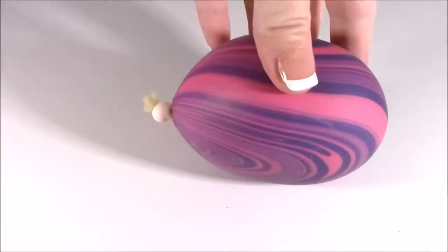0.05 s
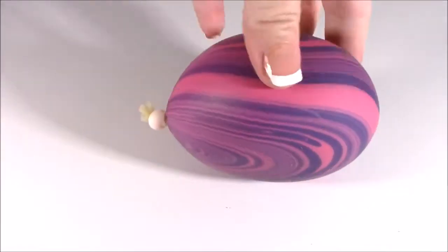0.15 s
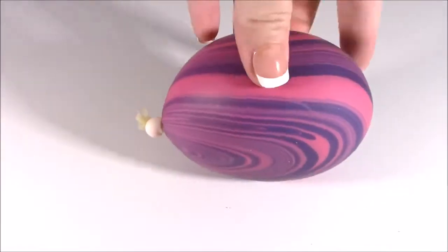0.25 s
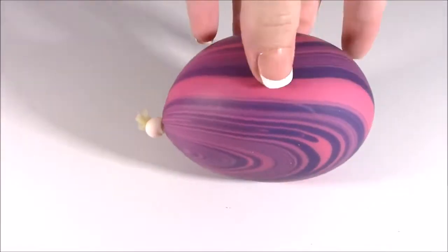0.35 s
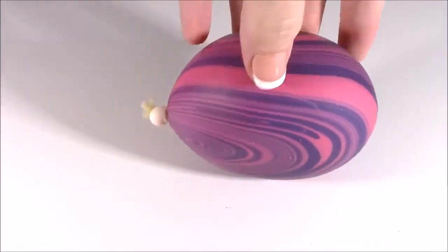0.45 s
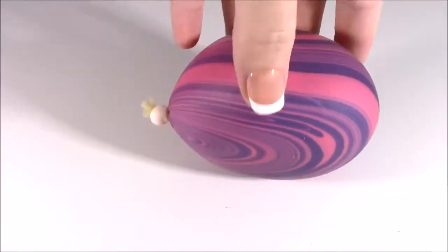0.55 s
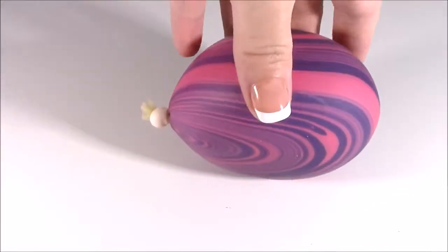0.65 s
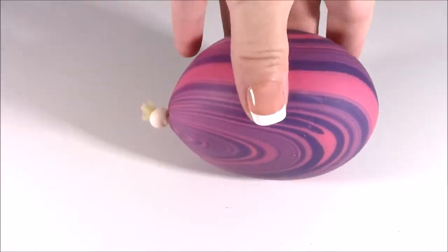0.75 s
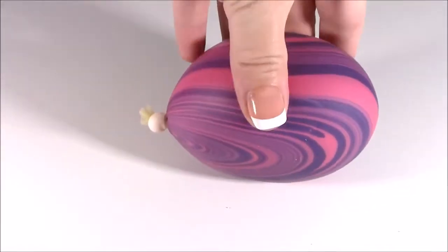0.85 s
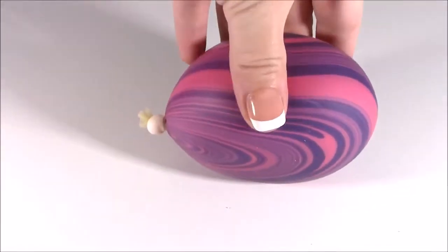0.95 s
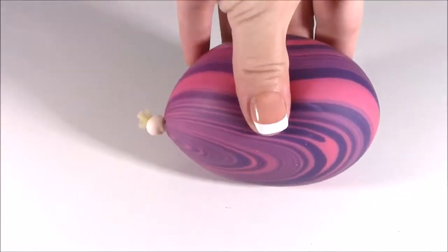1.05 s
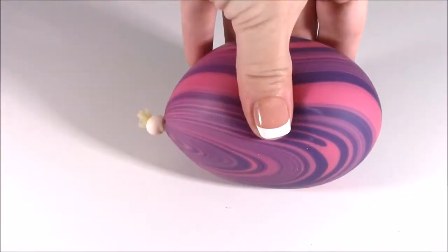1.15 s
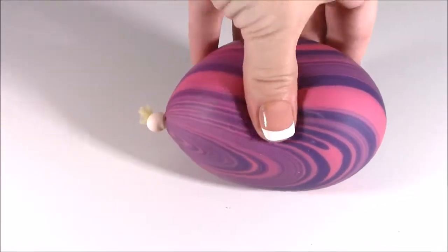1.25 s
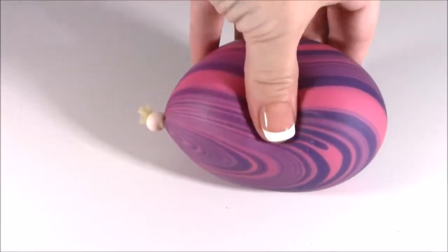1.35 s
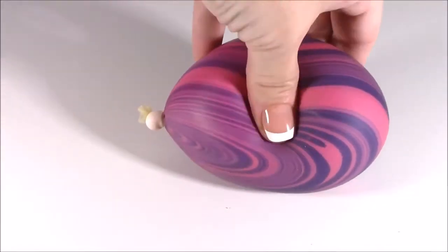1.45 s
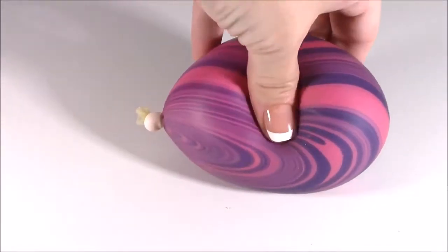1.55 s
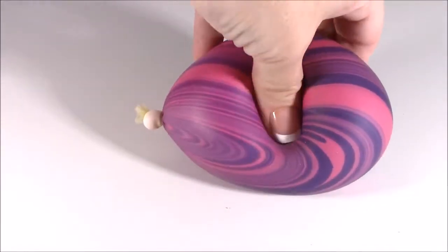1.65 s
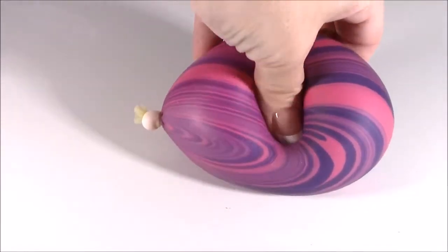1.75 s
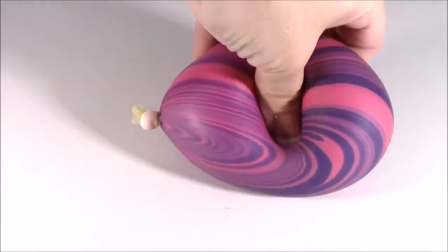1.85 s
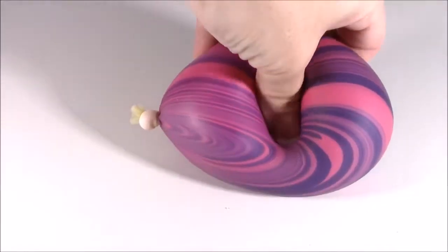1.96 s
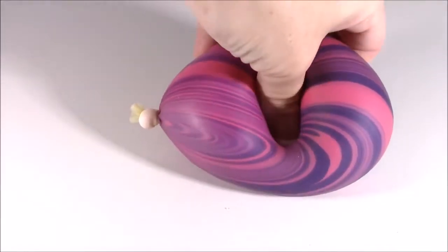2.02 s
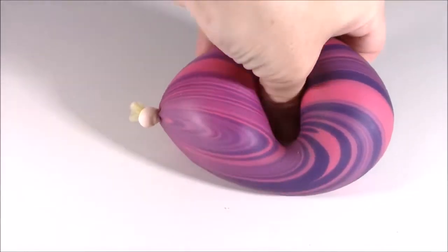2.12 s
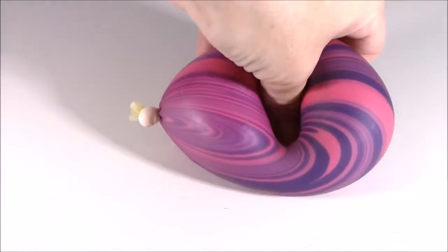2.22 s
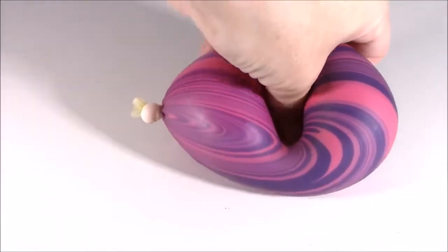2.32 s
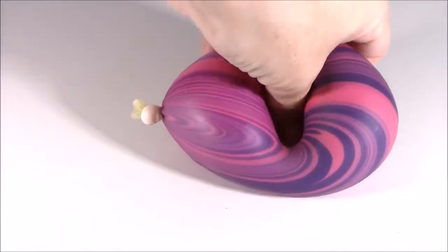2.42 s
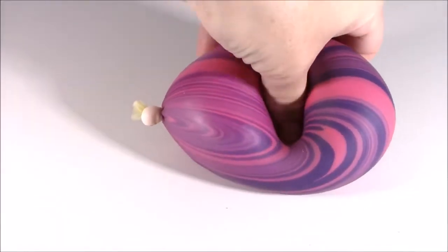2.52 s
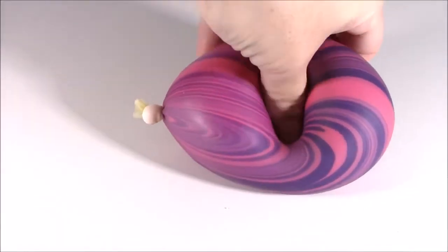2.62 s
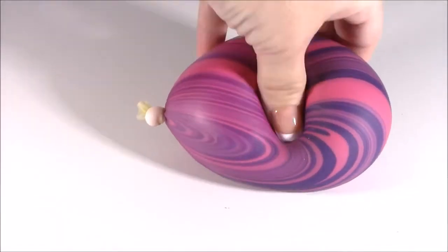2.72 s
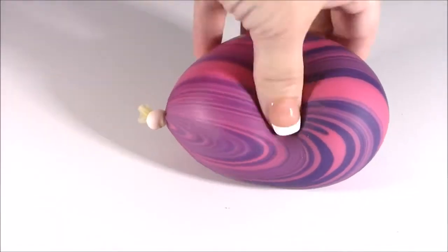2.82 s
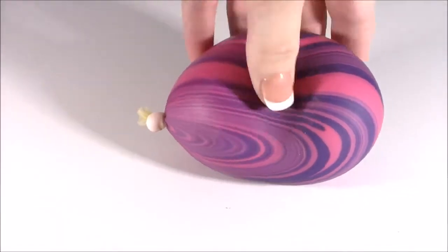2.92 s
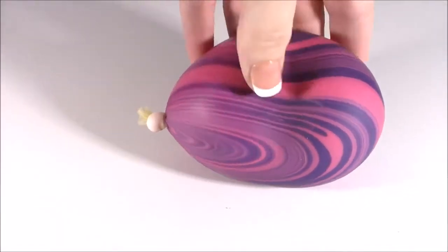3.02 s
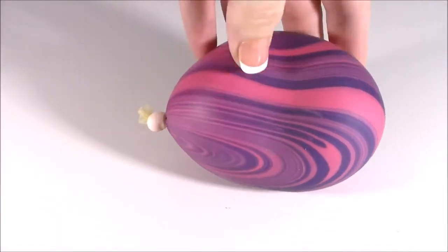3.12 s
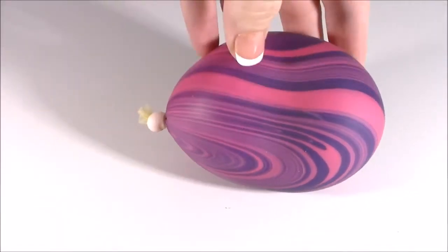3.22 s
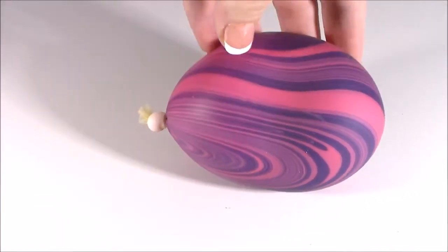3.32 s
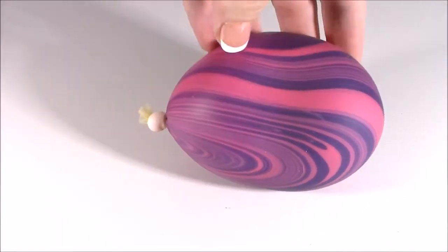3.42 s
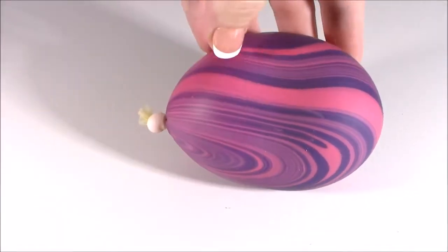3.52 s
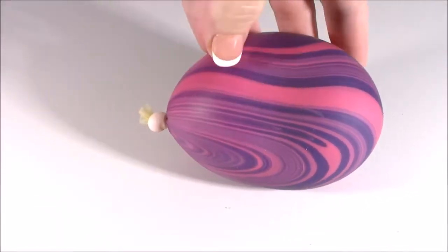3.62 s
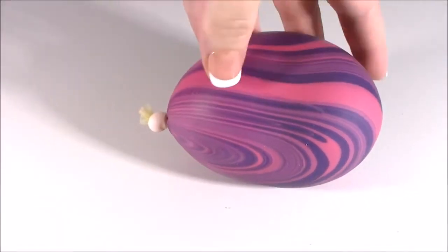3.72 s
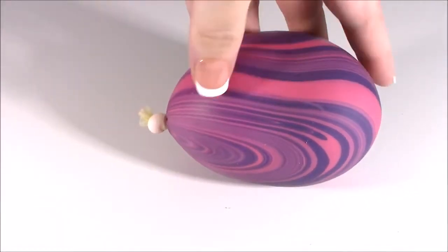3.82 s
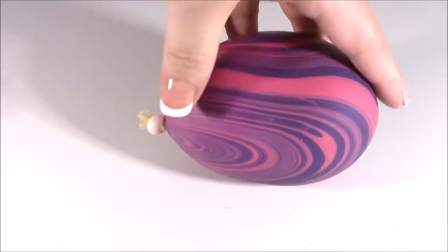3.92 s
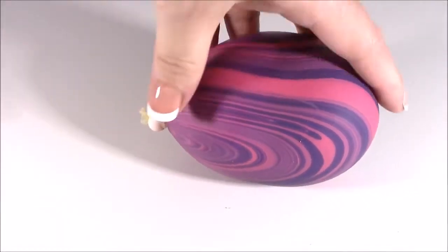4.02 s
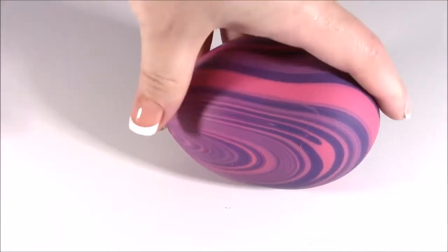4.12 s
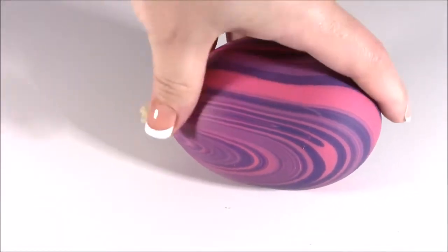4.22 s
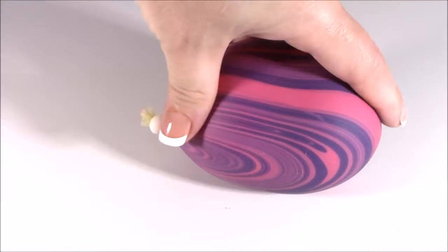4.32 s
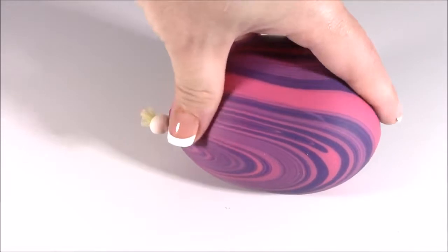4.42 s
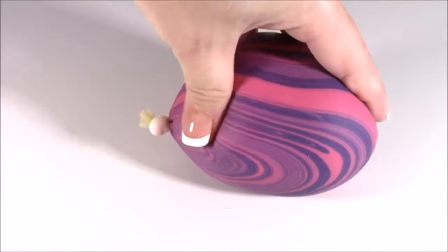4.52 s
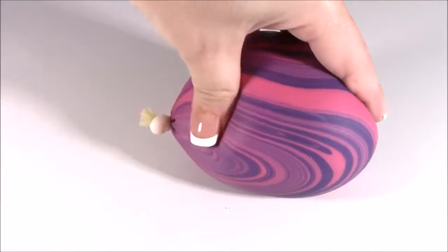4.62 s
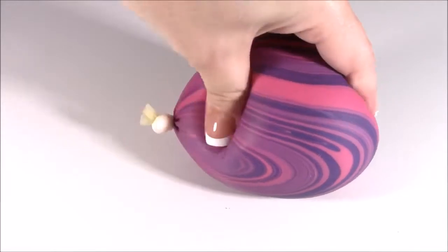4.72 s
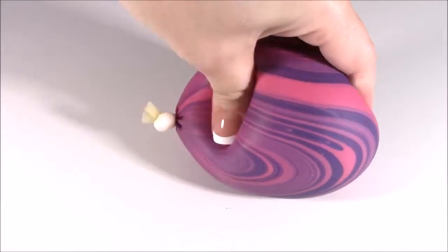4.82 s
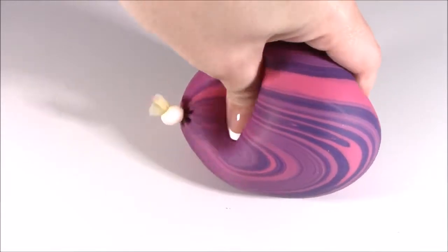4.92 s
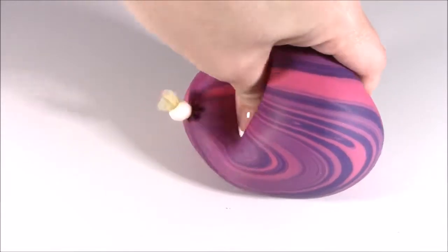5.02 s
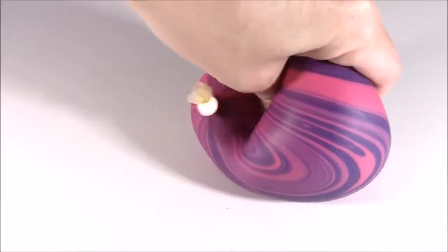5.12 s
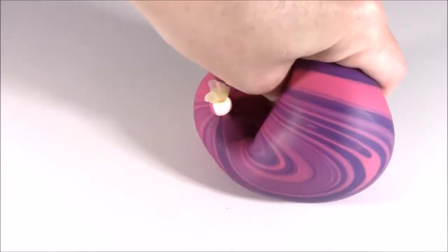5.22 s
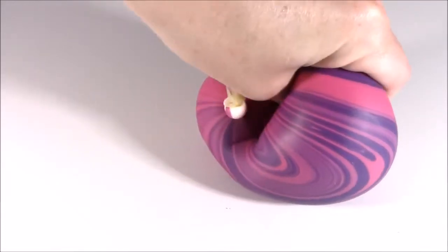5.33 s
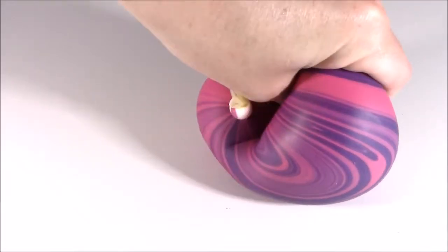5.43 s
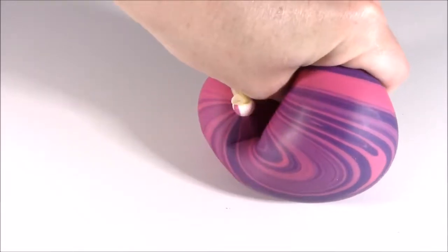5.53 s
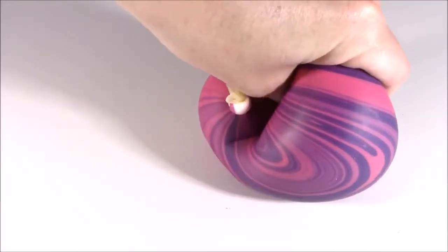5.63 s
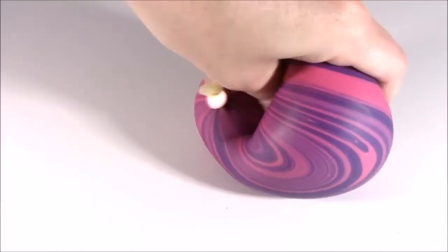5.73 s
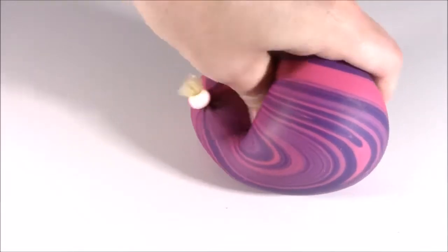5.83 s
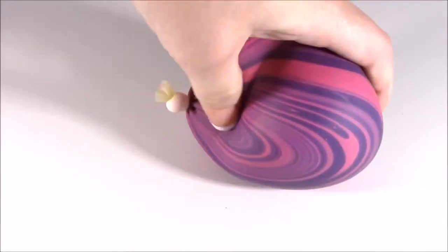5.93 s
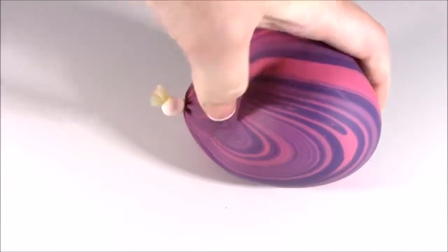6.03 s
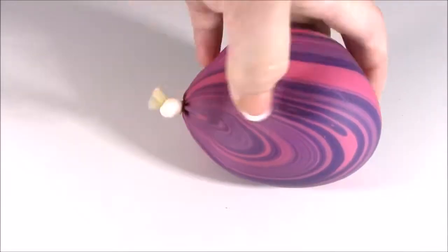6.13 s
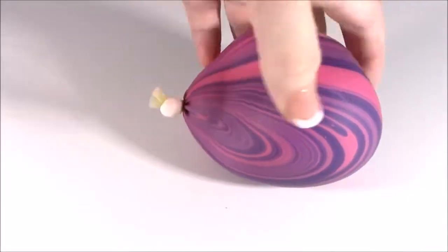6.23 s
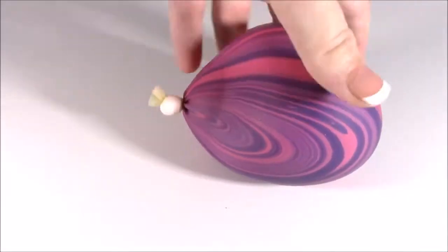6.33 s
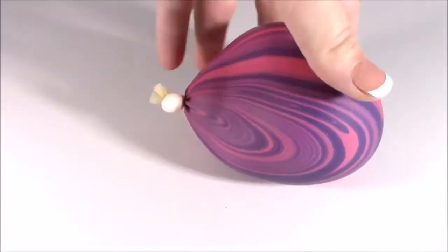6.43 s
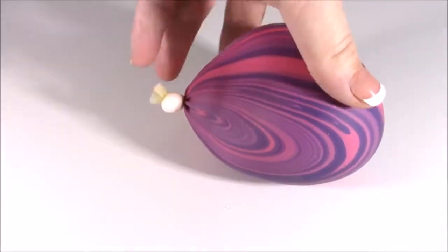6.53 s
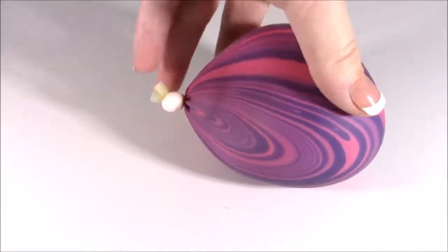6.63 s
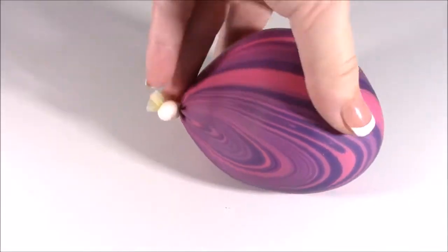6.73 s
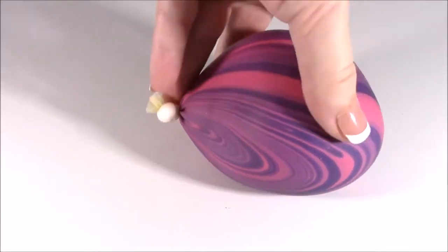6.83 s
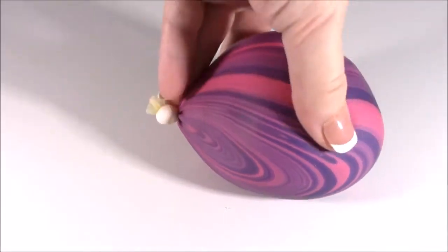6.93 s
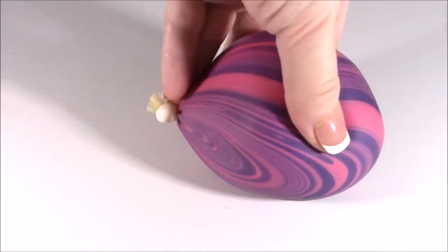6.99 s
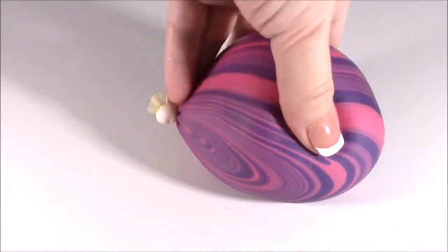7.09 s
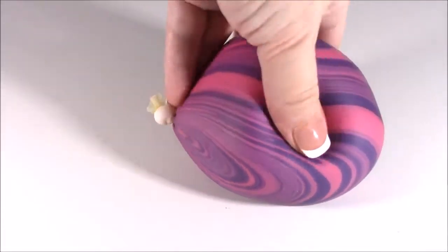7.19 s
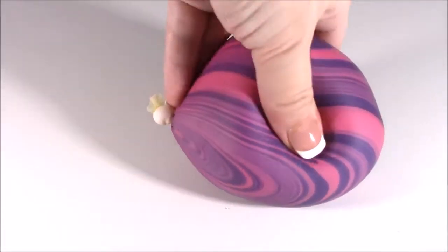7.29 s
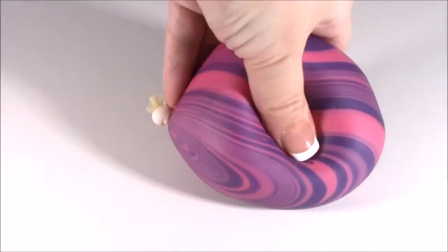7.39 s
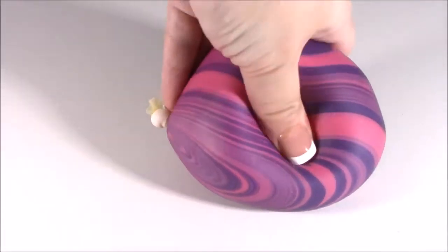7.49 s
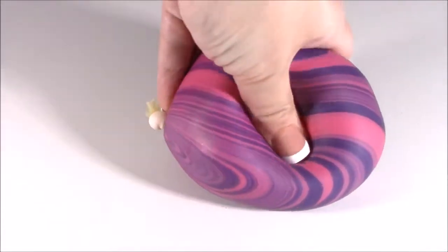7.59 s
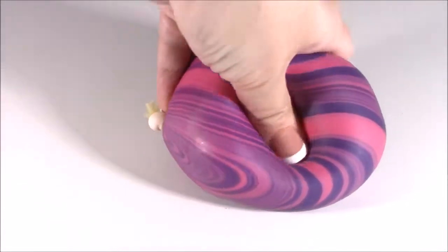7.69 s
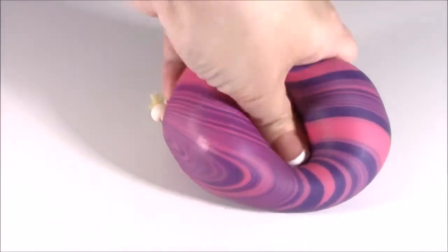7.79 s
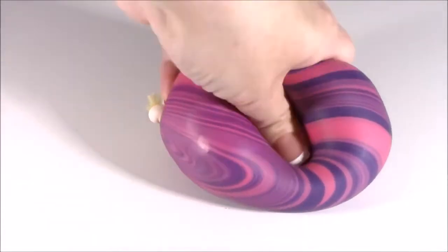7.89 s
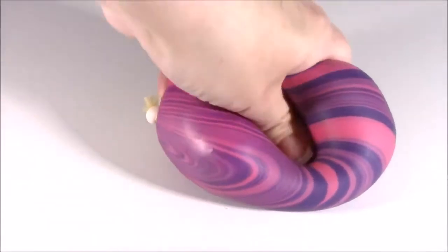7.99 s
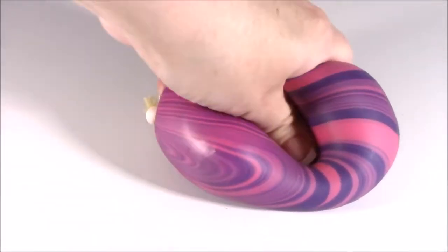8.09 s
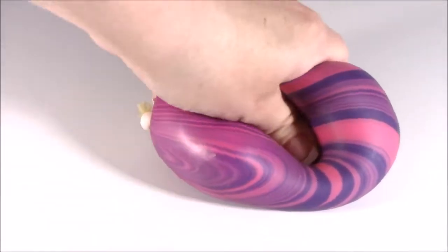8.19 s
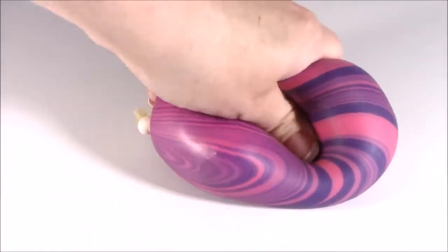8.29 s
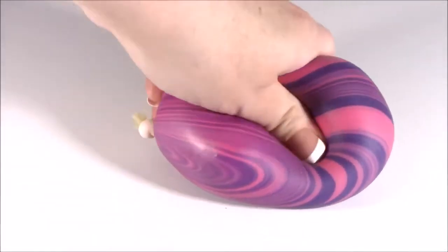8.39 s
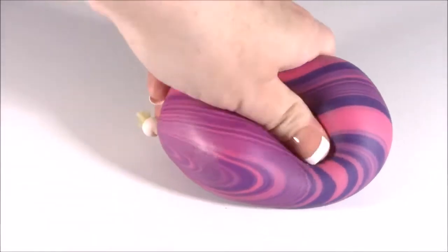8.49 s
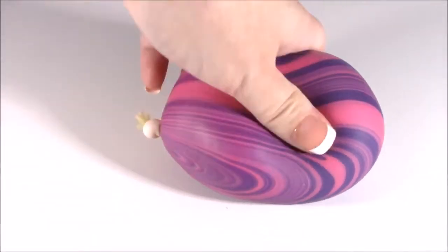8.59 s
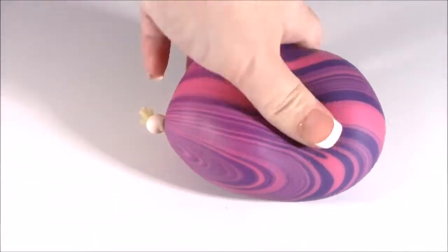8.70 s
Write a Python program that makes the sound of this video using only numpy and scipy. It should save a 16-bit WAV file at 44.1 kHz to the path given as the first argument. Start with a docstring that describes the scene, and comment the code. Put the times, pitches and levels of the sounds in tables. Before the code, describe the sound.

Close in a small quiet room, a thumb presses a soft-filled rubber balloon on a table. Sparse ticks lead into gritty, crunching squeaks as it sinks in; then the ball swells back with a louder burst of crackles, snaps and rubbery creaks. This happens three times, with quiet gaps of faint ticking between. Low room rumble sits underneath, the top treble is dull, and a short soft room tail surrounds it.

```python
"""In a small quiet room, on a table, a thumb kneads a balloon stuffed with soft filling: three slow squeezes.
Clumped ringing grains and low noise make the filling crunch, squeak and heave as each press sinks and lets go.
The rubber snaps (filtered kicks), brushes (swelling noise), creaks (trains of slips) and pops (gliding twangs).
Low decaying sines wobble the ball on the table; room modes, a diffuse tail and room tone surround it."""
import sys
import numpy as np
from scipy import signal
from scipy.fft import rfft, irfft
from scipy.io import wavfile

SR = 44100
rng = np.random.default_rng(int(sys.argv[2]) if len(sys.argv) > 2 else 0)


def inscribe(sig):
    """Save sig as 16-bit PCM at rate SR to the path in sys.argv[1].

    A 1-D sig is mono; a 2-D sig holds one channel per row.
    Samples are clipped to [-1, 1] before scaling.
    """
    pcm = np.round(np.clip(np.atleast_2d(sig).T, -1, 1) * 32767)
    wavfile.write(sys.argv[1], SR, pcm.astype(np.int16))


N = 385875

# colour of the room tone: f/Hz, relative level/dB
ROOM_TONE_COLOUR = [(15, -34.5), (27, -13), (45, -2.5), (174, -0.5), (212, -6.5), (246, -1.5), (315, -8),
                    (425, -5.5), (470, -10), (811, -10.5), (874, -13), (1550, -16.5), (3980, -23.5),
                    (6710, -28), (9500, -54), (12400, -99), (20900, -120)]
# left-right likeness of the room tone: f/Hz, likeness (1 = identical)
ROOM_TONE_LIKENESS = [(40, 0.96), (130, 0.72), (400, 0.59), (1500, 0.72), (8000, 0.97)]
ROOM_TONE_DB = -57.5   # level of what both sides share

# how hard the filling is worked while the thumb sinks in, one curve per squeeze: t/s, crunch drive level/dB
PRESS_CURVES = [
    [(.85, -67), (1.42, -54.5), (1.65, -57), (1.69, -44.5), (1.8, -51), (1.85, -48), (1.92, -55),
     (1.98, -57), (2.25, -45), (2.38, -60)],
    [(4.19, -69), (4.25, -59), (4.55, -52), (4.82, -52.5), (5.02, -45), (5.08, -37), (5.2, -45),
     (5.32, -48), (5.5, -61)],
    [(6.67, -60), (6.8, -59), (6.88, -50), (6.95, -55), (7.45, -53.5), (7.8, -50), (8.05, -47.5),
     (8.2, -58)],
]
# the same while the hand lets go and the ball swells back: t/s, crunch drive level/dB
RELEASE_CURVES = [
    [(2.38, -60), (2.51, -55), (2.57, -38), (2.67, -39), (2.7, -41), (2.745, -38.5), (2.765, -43),
     (2.81, -38), (2.87, -53), (2.95, -59), (3.2, -68)],
    [(5.5, -61), (5.64, -48), (5.72, -46), (5.76, -41), (5.84, -41), (5.89, -35.5), (5.93, -41.5),
     (5.985, -57), (6.3, -67)],
    [(8.2, -58), (8.29, -53), (8.33, -47), (8.39, -48), (8.49, -41), (8.54, -45), (8.61, -43.5),
     (8.75, -57.5)],
]
# how much the skin clings, one row per squeeze: crackle above crunch in the press, in the release: level/dB, level/dB
SKIN_CLING = [(-4, -14), (-5.5, -3.5), (-3, -1)]
REST_DB, FULL_DB = -71, -35   # crunch drive under a resting hand, and at full effort

# colour of the low heave: f/Hz, relative level/dB
HEAVE_COLOUR = [(35, -18.5), (60, -3), (120, 4.5), (190, 8), (280, 6.5), (450, -47)]
# colour of the crunching filling: f/Hz, relative level/dB
CRUNCH_COLOUR = [(250, 1), (450, -6), (800, 4.5), (1200, -7.5), (1800, -5), (2500, -19.5)]
# colour of the small squeaks: f/Hz, relative level/dB
SQUEAK_COLOUR = [(500, -6.5), (800, -4), (1100, -6.5), (1600, -2.5), (2300, -6.5), (3200, -9.5)]
# colour of the skin's crackle and friction: f/Hz, relative level/dB
CRACKLE_COLOUR = [(1900, 2), (2600, -5.5), (3600, 5), (5000, -1), (6300, -8.5), (7500, -29), (9500, -40)]
HEAVE_DB, HEAVE_FOLLOWS = -49, 0.53   # heave drive at full effort; share of the crunch's swing in dB
# the filling shifts in one lump: t/s, heave drive level/dB, length/s
SLUMPS_OF_FILLING = [(.24, -51.5, 0.055), (1.41, -52.5, 0.035), (2.53, -44.5, 0.29), (5.05, -44, 0.046),
                     (5.56, -45.5, 0.39), (6.82, -56, 0.87), (7.8, -48.5, 0.13), (8.32, -46, 0.29)]
SLUMP_ATTACK_S, SLUMP_RELEASE_S = 0.0061, 0.039
# the thumb drags over taut rubber: t/s, crackle drive level/dB, length/s
THUMB_DRAGS = [(1.19, -51.5, 0.052), (1.55, -50, 0.047), (2.06, -44.5, 0.023), (2.12, -39.5, 0.013),
               (2.24, -45.5, 0.042), (2.66, -48, 0.01), (2.738, -43.5, 0.052), (4.51, -55, 0.065),
               (4.93, -49.5, 0.053), (5.09, -53, 0.15), (5.27, -48.5, 0.13), (5.843, -44, 0.075),
               (6.35, -56, 0.059), (8.0, -47, 0.13), (8.57, -48.5, 0.11)]
DRAG_ATTACK_S, DRAG_RELEASE_S = 0.013, 0.027

# rubber letting go at one spot, before the room: t/s, peak level/dB, centre f/Hz, width/octaves
RUBBER_SNAPS = [(0.1747, -33, 1560, 3.1), (0.7988, -30.5, 4050, 0.5), (.904, -37, 3650, 1.5),
                (.958, -43, 5700, 0.19), (.971, -38.5, 3480, 1.1), (1.0123, -41.5, 1210, 0.58),
                (1.091, -37, 4340, 0.57), (1.1922, -31, 1890, 7.6), (1.289, -40, 990, 1.5),
                (1.3408, -43, 3300, 1.2), (1.38, -37, 2920, 2.2), (1.3974, -38, 4170, 0.23),
                (1.4176, -40, 1900, 2.5), (1.4635, -40, 2630, 0.92), (1.4685, -43, 5200, 0.46),
                (1.5446, -32, 4570, 0.17), (1.5552, -44, 1300, 1), (1.5957, -34, 2400, 3.8),
                (1.6136, -36, 5500, .8), (1.6553, -21.5, 1900, 2.8), (1.6595, -31, 2200, 3.5),
                (1.6768, -29, 2600, 2.9), (1.6835, -24, 1290, 2.6), (1.708, -29, 1070, 2.1),
                (1.771, -29.5, 1200, 3.6), (1.8207, -14, 2380, 2.3), (1.8485, -20, 2520, 2.4),
                (1.857, -22.5, 4300, 0.59), (1.9447, -18.5, 4100, 0.41), (1.9574, -32, 4500, 0.55),
                (2.012, -19, 3840, 0.94), (2.0546, -33, 2700, 2), (2.0672, -32, 3950, 2),
                (2.091, -21, 2390, 3), (2.133, -24.5, 3780, 2), (2.153, -32, 2300, 2.3),
                (2.168, -31.5, 1640, 0.19), (2.2195, -24.5, 2300, 2.1), (2.2367, -28.5, 1680, 0.3),
                (2.2573, -22, 2830, 2.5), (2.3107, -22.5, 5230, 1.2), (2.469, -30, 2300, 2.9),
                (2.4807, -37, 1400, 1.7), (2.4971, -19.5, 1920, 0.56), (2.5352, -27, 2470, 2.8),
                (2.5685, -11.5, 1380, 1.9), (2.6742, -23, 1900, 4.4), (2.7065, -32, 700, 1.2),
                (2.7465, -30.5, 500, 1.7), (2.7502, -22.5, 1050, 2.7), (2.7525, -29, 3600, 1.8),
                (2.777, -20, 2400, 5.1), (2.8003, -17, 2630, 5.7), (2.8022, -17, 3020, 0.67),
                (2.8254, -9, 2120, 3.6), (2.8472, -24, 4340, 0.22), (2.9511, -37, 2200, 2.5),
                (2.9948, -32.5, 4070, 0.79), (3.0218, -31.5, 1600, 2), (3.1507, -37.5, 840, 2.4),
                (3.428, -39.5, 3550, 1.6), (3.632, -41.5, 2340, 0.94), (4.1007, -27, 3770, 1),
                (4.222, -45, 1050, 0.64), (4.2535, -43.5, 1100, 1.4), (4.3207, -29, 4430, 0.44),
                (4.385, -37, 3850, 0.46), (4.516, -34.5, 1670, 0.53), (4.52, -32.5, 4800, 1),
                (4.565, -33, 3200, 1.8), (4.573, -36.5, 1550, 0.2), (4.5889, -37, 1420, 0.56),
                (4.6507, -33, 3000, 1.9), (4.658, -34, 1760, 0.9), (4.7046, -37, 3000, 2),
                (4.717, -40.5, 1600, 0.54), (4.774, -37, 4480, 0.54), (4.802, -37.5, 2870, 1.3),
                (4.865, -34, 4460, 0.26), (4.9335, -31, 1700, 1), (4.9382, -24.5, 3820, 6.2),
                (5.0287, -28, 2430, 0.31), (5.0454, -24, 1600, 1), (5.057, -18, 2160, 0.51),
                (5.0828, -19.5, 5080, 1.3), (5.1225, -25, 3000, 1.6), (5.2025, -25, 4300, .8),
                (5.2793, -23.5, 3260, 0.37), (5.2954, -21, 5860, 1.2), (5.336, -30, 3980, 0.91),
                (5.3789, -27.5, 2970, 2.8), (5.4036, -31, 3470, 0.94), (5.415, -36, 3600, 1.3),
                (5.438, -34.5, 4030, 0.48), (5.47, -37, 4000, 0.73), (5.527, -36, 4270, 0.74),
                (5.536, -36, 4760, 0.58), (5.617, -28.5, 3540, 1.5), (5.685, -30, 3720, 2.5),
                (5.699, -29.5, 1870, 0.53), (5.7355, -28.5, 1050, 3.7), (5.7517, -28.5, 660, 1.5),
                (5.813, -24, 1000, 2.1), (5.866, -23, 1800, 1), (6.1217, -39, 4400, 0.74),
                (6.1583, -37.5, 2440, 1.9), (6.357, -36.5, 750, 7.1), (6.6743, -20.5, 1780, 2.2),
                (6.917, -32.5, 2700, 0.15), (6.964, -34.5, 2900, 0.53), (6.98, -30, 1400, 7.2),
                (7.036, -34.5, 1600, 1.8), (7.1427, -34.5, 3300, 0.44), (7.159, -42, 2700, 1.5),
                (7.2465, -44, 590, 1.4), (7.2855, -33, 2900, 1.4), (7.332, -40, 2800, 1.8),
                (7.3615, -32.5, 3570, 1.3), (7.436, -36.5, 4100, 0.74), (7.495, -34.5, 2440, 2.8),
                (7.5132, -37, 3900, 1.2), (7.5571, -40, 2200, 1.7), (7.7158, -31, 1700, 4.5),
                (7.7318, -15, 4900, 2.05), (7.7383, -29, 2520, 0.74), (7.8044, -33, 1780, 2.6),
                (7.8942, -15, 2400, 4), (7.9, -24, 5200, 2.6), (7.9103, -34, 2200, 2.5),
                (7.9336, -24, 3270, 4.1), (7.9696, -23.5, 1400, 2.6), (8.0235, -39, 1300, 0.8),
                (8.0275, -23, 2240, 3.2), (8.0411, -31.5, 1770, .77), (8.0595, -27, 5600, .6),
                (8.081, -30, 6000, 0.65), (8.09, -23.5, 4900, 0.67), (8.2047, -37, 3500, 1.1),
                (8.2351, -31, 3420, 2.5), (8.27, -39, 950, 0.86), (8.2913, -36, 1010, 0.88),
                (8.41, -25.5, 4200, 1.4), (8.4691, -28, 4000, 2.4), (8.495, -22.5, 2780, 5),
                (8.525, -29, 690, 1.1), (8.5579, -23, 3300, 0.38), (8.5948, -29.5, 2400, 4.5),
                (8.626, -34, 1600, 1.3), (8.645, -31, 4500, 1.8), (8.674, -34, 2600, 2)]
# lesser snaps come by chance, more often and louder with effort; rate and level are those at full effort
SMALL_SNAPS_PER_S, SMALL_SNAP_DB, SMALL_SNAP_FOLLOWS, SMALL_SNAP_SPREAD_DB = 85, -37, 0.43, 1.5
SMALL_SNAP_LOW_HZ, SMALL_SNAP_HIGH_HZ, SMALL_SNAP_OCTAVES = 900, 5600, 0.94

# a fingertip brushing over dry rubber: t/s, rms level/dB before the grain, centre f/Hz, length/s
FINGER_BRUSHES = [(0.35, -64, 2600, 0.18), (0.39, -67.5, 1400, 0.13), (2.641, -47.5, 2900, 0.06),
                  (2.712, -48.5, 2650, 0.033), (5.899, -65, 1900, 0.14), (6.848, -52, 4630, 0.043),
                  (6.861, -51.5, 2900, 0.059)]
# rubber skidding along a finger: t/s, level/dB before trim, ring f/Hz, nominal width/octaves, length of slipping/s
RUBBER_CREAKS = [(1.019, -54.5, 1150, 0.24, 0.0088), (1.407, -48, 1015, 1.9, 0.014),
                 (1.473, -47.5, 783, 0.35, 0.008), (1.822, -32, 1410, 0.59, 0.0067),
                 (2.249, -36.5, 1000, 0.93, 0.0054), (2.522, -40, 450, 1.5, 0.0039),
                 (2.538, -35.5, 900, 3, 0.0091), (2.554, -28.5, 1690, 1.96, 0.01),
                 (2.571, -36, 2000, 1.8, 0.0047), (2.582, -38, 900, 1.2, 0.0089),
                 (2.673, -32, 1124, 2.6, 0.0056), (2.781, -36, 1090, 0.51, 0.0071),
                 (4.447, -42.5, 684, 1.6, 0.0038), (4.741, -48, 710, 0.76, 0.012),
                 (4.852, -41.5, 1500, 0.11, 0.014), (4.955, -37, 1402, 1.8, 0.014),
                 (5.005, -32, 6540, 0.92, 0.0077), (5.01, -34.5, 1290, 1.3, 0.0057),
                 (5.097, -23, 4970, 0.39, 0.011), (5.156, -29.5, 4880, 0.95, 0.018),
                 (5.26, -35.5, 1756, 0.66, 0.0093), (5.552, -51, 488, 1.4, 0.015),
                 (5.618, -38.5, 640, 0.94, 0.0057), (5.64, -43, 850, 0.34, 0.015),
                 (5.733, -32, 660, 0.61, 0.003), (5.761, -36.5, 720, 0.98, 0.009),
                 (5.796, -36, 995, 3.1, 0.011), (5.81, -31, 938, 3.4, 0.0091),
                 (5.852, -30, 4020, 0.87, 0.0052), (5.8665, -26.5, 1660, 0.94, 0.01),
                 (5.877, -29, 1050, 3.8, 0.01), (5.892, -36, 1760, 2.9, 0.013),
                 (6.867, -43, 2280, 1.9, 0.012), (6.976, -46.5, 450, 1, 0.0044),
                 (7.008, -48, 664, 0.56, 0.0049), (7.138, -45, 628, 1.4, 0.0075),
                 (7.245, -48, 440, 1.1, 0.01), (7.272, -51, 660, 1, 0.0049),
                 (7.507, -48.5, 480, 0.7, 0.0087), (7.592, -46, 494, 0.43, 0.0048),
                 (7.68, -56, 860, .7, .014), (7.717, -44, 595, 1.5, 0.005), (7.809, -44, 635, 1.5, 0.0048),
                 (7.907, -41, 767, 0.41, 0.0066), (8.3127, -37, 885, 1.5, 0.011),
                 (8.362, -34, 2220, 1.4, 0.0048), (8.3995, -35, 783, 0.6, 0.0069),
                 (8.423, -29, 2687, 1.26, 0.0064), (8.456, -39, 1500, 1, .004),
                 (8.489, -40, 1000, 1.3, 0.005), (8.605, -34.5, 4450, 0.58, 0.018)]
# a fold pulls open and twangs: t/s, level/dB before sag and roughness, start f/Hz, end f/Hz, length/s
# the pitch slides with the tension
FOLD_POPS = [(1.6552, -23, 890, 1020, 0.0027), (1.6597, -24.5, 1290, 1160, 0.0034),
             (1.677, -28, 710, 1095, 0.005), (1.6817, -26, 900, 1410, 0.0034),
             (2.4975, -22.5, 1910, 1800, 0.0023), (2.556, -19.5, 946, 613, 0.0086),
             (2.5725, -22, 1900, 1330, 0.0023), (2.588, -28.5, 520, 400, .011),
             (2.8248, -25.5, 1140, 1120, 0.0051), (5.0574, -23.5, 2060, 1450, 0.0052),
             (8.361, -32, 740, 1070, 0.0034)]
# the filling slumps and rocks the ball on the table: t/s, level/dB before the soft push, f/Hz, t60/s
BALL_THUDS = [(2.528, -34, 71.4, 0.11), (2.556, -34, 92, 0.082), (5.556, -35, 71, 0.11),
              (5.589, -34, 105, 0.1), (5.616, -36, 115.4, 0.15), (8.32, -31.5, 124, 0.082),
              (8.334, -37, 88, 0.081), (8.366, -41, 116, 0.11)]

# resonant modes of the small room: f/Hz, width/Hz, lift level/dB
ROOM_MODES = [(132, 16, 8), (188, 19, 6.5), (249, 15, 3), (332.4, 30, 8.5), (438, 54, 8), (528, 90, 3),
              (602, 18, 4), (660, 28, 5.5), (775, 41, 7.5), (978, 26, 4), (1144, 26, 5), (1320, 18, 1.5),
              (1550, 87, 4), (1760, 67, 2.5), (1968, 25, 3), (4900, 160, 2), (5920, 180, 2.5)]
# room tail: f/Hz, t60/s, level/dB, left-right difference level/dB relative to it
ROOM_TAIL = [(100, 0.82, -5, -25), (400, 0.8, -8, -27), (1500, 0.75, -9.5, -12.5), (3020, 1, -13, -10.5),
             (4970, 0.58, -16.5, -11), (9000, 0.081, -5.5, -8)]
TREBLE_HZ, CUTOFF_HZ = 7030, 9300   # gentle treble droop, then the steep top cut


def from_db(db):
    """Decibels to gain."""
    return 10 ** (np.asarray(db) / 20)


def rms_one(x):
    """Scale to rms 1."""
    return x / np.sqrt(np.mean(x ** 2) + 1e-20)


def at_hz(points, hz, axis=1):
    """Read one column of a table on a log-frequency axis."""
    points = np.array(points)
    return np.interp(np.log(hz + 1e-9), np.log(points[:, 0]), points[:, axis])


def in_time(rows):
    """One stroke's level at every sample, as a gain; silent outside the stroke."""
    s, level_db = np.transpose(rows)
    t = np.arange(N) / SR
    inside = (t >= s[0]) & (t < s[-1])
    return from_db(np.interp(t, s, level_db)) * inside


def drift(rate_hz):
    """Slow random wandering of rms 1: noise through two equal one-pole smoothers, drawn every 40 samples."""
    step = 40
    r = np.exp(-2 * np.pi * rate_hz * step / SR)
    raw = rng.standard_normal(N // step + 2002)
    slow = signal.lfilter([1], [1, -2 * r, r * r], raw)[2000:]   # skip the filter's start
    return np.interp(np.arange(N) / step, np.arange(len(slow)), rms_one(slow))


def band(x, hz, octaves, order=1):
    """A broad resonance around hz."""
    half_width = 2 ** (octaves / 2)
    edges = np.clip([hz / half_width, hz * half_width], 10, .45 * SR)
    return signal.sosfilt(signal.butter(order, edges, "band", fs=SR, output="sos"), x + 1e-18)


def soften(x, hz, order=2):
    """Low-pass."""
    return signal.sosfilt(signal.butter(order, min(hz, SR / 2 - 1), fs=SR, output="sos"), x)


def noise(spectrum):
    """Smooth noise of a given colour, rms 1."""
    colour = from_db(at_hz(spectrum, np.fft.rfftfreq(N, 1 / SR)))
    return rms_one(irfft(rfft(rng.standard_normal(N)) * colour, N))


def add(track, s, sound):
    """Mix a sound in at time s."""
    at = max(round(s * SR), 0)
    track[at:at + len(sound)] += sound[:N - at]


def swells(rows, attack_s, release_s):
    """Gain of short movements: each rises, holds to the end of its length and dies away."""
    out, t = np.zeros(N), np.arange(SR) / SR
    for s, level_db, length in rows:
        rise = np.minimum(t / attack_s, 1)
        fall = np.exp(-np.maximum(t - length, 0) / release_s)
        add(out, s, from_db(level_db) * rise * fall)
    return out


def room_tone():
    """Steady rumble and hiss; a noise of opposite sign on each side sets how alike the two sides are."""
    alike = np.clip(at_hz(ROOM_TONE_LIKENESS, np.fft.rfftfreq(N, 1 / SR)), 0, 1)
    side_ratio = np.sqrt((1 - alike) / (1 + alike))
    side = irfft(rfft(noise(ROOM_TONE_COLOUR)) * side_ratio, N)
    return from_db(ROOM_TONE_DB) * (noise(ROOM_TONE_COLOUR) + side * [[1], [-1]])


def strokes():
    """Drive gains of crunch and crackle through the three presses and releases, over the resting hand."""
    crunch = crackle = np.full(N, from_db(REST_DB))
    for press, release, (press_db, release_db) in zip(PRESS_CURVES, RELEASE_CURVES, SKIN_CLING):
        for rows, cling_db in ((press, press_db), (release, release_db)):
            stroke = in_time(rows)
            crunch = np.maximum(crunch, stroke)
            crackle = np.maximum(crackle, from_db(cling_db) * stroke)
    return crunch, crackle


def grains(spectrum, per_s, spread_db, clump_db, octaves, patchy_db=2.5, count=14):
    """Tiny slips come in clumps; each rings briefly at the pitch of its own patch of rubber. Rms 1."""
    rate = per_s * from_db(clump_db * 2 * np.tanh(drift(35) / 2))
    at = np.flatnonzero(rng.random(N) < rate / SR)
    sizes = from_db(spread_db * np.minimum(rng.exponential(1, len(at)), 3))
    sizes = sizes * rng.choice([-1, 1], len(at))
    sizes = sizes / np.sqrt(per_s[at])   # denser grains are smaller, so density does not set the level
    patch = rng.integers(0, count, len(at))
    out = np.zeros(N)
    for k, hz in enumerate(np.geomspace(spectrum[0][0], spectrum[-1][0], count)):
        # each patch grips and eases for some milliseconds
        grip = from_db(patchy_db * np.minimum(drift(37)[at], 1.6))
        clicks = np.zeros(N)
        clicks[at] = sizes * grip * (patch == k)
        out += from_db(at_hz(spectrum, hz)) * band(clicks, hz, octaves, order=2)
    return rms_one(out)


def kneading(crunch_gain, crackle_gain, crunch_db=-6.5, squeak_db=-4.5, crackle_db=-4.5, friction_db=-7.5):
    """The harder the hand works, the denser and louder the filling crunches and the skin squeaks and crackles."""
    work = crunch_gain / from_db(FULL_DB)
    effort = work ** .45
    slump_gain = swells(SLUMPS_OF_FILLING, SLUMP_ATTACK_S, SLUMP_RELEASE_S)
    heave_gain = np.hypot(from_db(HEAVE_DB) * work ** HEAVE_FOLLOWS, slump_gain)
    skin_gain = np.hypot(crackle_gain, swells(THUMB_DRAGS, DRAG_ATTACK_S, DRAG_RELEASE_S))

    heave = from_db(-8.5) * heave_gain * noise(HEAVE_COLOUR)
    crunch = grains(CRUNCH_COLOUR, 2200 * effort, spread_db=2.5, clump_db=5.0, octaves=1.0)
    squeaks = grains(SQUEAK_COLOUR, 600 * effort, spread_db=1.0, clump_db=3.0, octaves=0.18)
    filling = from_db(crunch_db) * crunch_gain * (crunch + from_db(squeak_db) * squeaks)
    crackle = grains(CRACKLE_COLOUR, 3200 * effort, spread_db=3.4, clump_db=3.5, octaves=.6)
    friction = from_db(friction_db) * noise(CRACKLE_COLOUR)
    skin = from_db(crackle_db) * skin_gain * (crackle + friction)
    return heave + filling + skin


def small_snaps(crunch_gain, rate_follows=0.46):
    """Rows of chance snaps, laid out like RUBBER_SNAPS: effort raises their rate and level."""
    work = crunch_gain / from_db(FULL_DB)
    chance = rng.random((N // 100, 2))   # columns: whether a snap is born, its pitch
    scatter = rng.standard_normal(len(chance))
    at = np.linspace(0, N - 1, len(chance)).astype(int)
    step_s = at[1] / SR
    born = chance[:, 0] < SMALL_SNAPS_PER_S * work[at] ** rate_follows * step_s
    effort_db = SMALL_SNAP_FOLLOWS * 20 * np.log10(work[at])
    peak_db = SMALL_SNAP_DB + effort_db + SMALL_SNAP_SPREAD_DB * scatter
    hz = SMALL_SNAP_LOW_HZ * (SMALL_SNAP_HIGH_HZ / SMALL_SNAP_LOW_HZ) ** chance[:, 1]
    return [(at[k] / SR, peak_db[k], hz[k], SMALL_SNAP_OCTAVES) for k in np.flatnonzero(born)]


def snaps(rows, flutter_db=-22, flutter_s=0.0055, flutter_hz=2400, bounce=0.33):
    """A patch of rubber flicks free, bounces off the table top and flutters dully for a few milliseconds."""
    out, t = np.zeros(N), np.arange(2048) / SR
    for s, peak_db, hz, octaves in rows:
        flutter = soften(rng.standard_normal(len(t)), flutter_hz) * np.exp(-t / flutter_s)
        kick = from_db(flutter_db) * flutter
        kick[0] += 1
        kick[round(rng.uniform(.0005, .001) * SR)] += bounce
        spread = min(octaves, 4)
        top_hz = 1.236 * hz * 2 ** (0.31 * spread)   # soft rubber cannot move much faster than its own ring
        bottom_hz = 0.39 * hz / 2 ** (spread / 2)   # and a small patch radiates no bass
        snap = soften(band(kick, hz, octaves), top_hz, order=4)
        snap = signal.sosfilt(signal.butter(2, bottom_hz, "high", fs=SR, output="sos"), snap)
        add(out, s, from_db(peak_db) * snap / np.abs(signal.hilbert(snap)).max())
    return out


def brushes(rough_db=3.5):
    """Skin sliding without sticking: a grainy swish, under an octave wide, that swells and fades."""
    out, grain = np.zeros(N), from_db(rough_db * drift(120))
    for s, level_db, hz, length in FINGER_BRUSHES:
        span = round(length * SR)
        swish = band(rng.standard_normal(span), hz, 0.77, order=2) * np.hanning(span)
        add(out, s, from_db(level_db) * rms_one(swish))
    return out * grain


def creaks(cycles_per_slip=1.8, uneven=.45, scuff_db=-21, fade=0.091, trim_db=-4.0):
    """The rubber catches and slips every couple of cycles of its own ring, weakening slightly over the run."""
    out = np.zeros(N)
    for s, level_db, hz, octaves, length in RUBBER_CREAKS:
        span = round(length * SR)
        gaps = cycles_per_slip * SR / hz * np.exp(uneven * rng.standard_normal(80))
        at = (np.cumsum(gaps) - gaps[0]).astype(int)
        inside = at < span
        slips = from_db(scuff_db) * rng.standard_normal(span)
        slips[at[inside]] += rng.uniform(.6, 1.3, 80)[inside]
        slips = slips * np.exp(-fade * np.arange(span) / span)
        slips = np.pad(slips, (0, 1024))   # time to ring out
        top_hz = 1.43 * hz * 2 ** (0.49 * min(octaves, 4))
        creak = soften(band(slips, hz, 0.78 * octaves), top_hz, order=3)
        add(out, s, from_db(level_db + trim_db) * creak * np.sqrt(span / np.sum(creak ** 2)))
    return out


def pops(overtone=1.7, overtone_db=-9, waver=0.19, waver_hz=700, rough_db=2.0, sag_db=-5,
         attack_s=0.00035, release_s=0.0011):
    """A fold springs open at once, twangs unevenly in two modes for a few cycles and is stopped by the skin."""
    out, t = np.zeros(N), np.arange(2048) / SR
    for s, peak_db, start_hz, end_hz, length in FOLD_POPS:
        along = np.minimum(t / length, 1)
        tension, grip = rms_one(soften(rng.standard_normal((2, len(t))), waver_hz))
        pitch_hz = start_hz * (end_hz / start_hz) ** along * np.exp(waver * tension)
        phase = 2 * np.pi * np.cumsum(pitch_hz) / SR
        twang = np.sin(phase) + from_db(overtone_db) * np.sin(overtone * phase)
        envelope = (1 - np.exp(-t / attack_s)) * np.exp(-np.maximum(t - length, 0) / release_s)
        add(out, s, from_db(peak_db + sag_db * along + rough_db * grip) * envelope * twang)
    return out


def thuds(push_s=0.011):
    """A soft push sets the heavy ball wobbling against the table: a low sine that dies away."""
    out, t = np.zeros(N), np.arange(SR // 2) / SR
    for s, level_db, hz, t60 in BALL_THUDS:
        wobble = np.sin(2 * np.pi * hz * t) * from_db(-60 * t / t60)
        add(out, s, from_db(level_db) * wobble * (1 - np.exp(-t / push_s)))
    return out


def room_modes(x):
    """Narrow two-pole room modes ring on beside the direct sound."""
    out = x
    for hz, width, lift_db in ROOM_MODES:
        r = np.exp(-np.pi * width / SR)
        feed = np.array([1, 0, -1]) * (1 - r * r) / 2
        feedback = [1, -2 * r * np.cos(2 * np.pi * hz / SR), r * r]
        out = out + (from_db(lift_db) - 1) * signal.lfilter(feed, feedback, x)
    return out


def room_tail(x, build_s=0.00075):
    """A diffuse tail of decaying noise bands, shortest in the top treble, a little different on each side."""
    t, tail = np.arange(SR) / SR, 0
    for hz in 100 * 2. ** np.arange(8):
        t60, level_db, side_db = (at_hz(ROOM_TAIL, hz, axis=column) for column in (1, 2, 3))
        decay = from_db(-60 * t / t60) * (1 - np.exp(-t / build_s))
        echoes = band(rng.standard_normal((2, SR)), hz, 0.91, order=2) * decay / np.linalg.norm(decay)
        tail = tail + from_db([[level_db], [level_db + side_db]]) * echoes
    mid, side = signal.fftconvolve(x[None], tail, axes=1)[:, :N]
    return mid + side * [[1], [-1]]


def scene():
    """The ball in the middle, the room around it."""
    crunch_gain, crackle_gain = strokes()
    chance_snaps = snaps(small_snaps(crunch_gain))
    rubber = snaps(RUBBER_SNAPS) + chance_snaps + brushes() + creaks() + pops()
    ball = room_modes(kneading(crunch_gain, crackle_gain) + rubber) + thuds()
    return ball + room_tail(ball) + room_tone()


def record(dry):
    """The treble droops, then the top is cut steeply."""
    drooped = soften(dry, TREBLE_HZ, order=3)
    top_cut = signal.ellip(10, .2, 70, CUTOFF_HZ, fs=SR, output="sos")
    return signal.sosfilt(top_cut, drooped)


dry = scene()
out = record(dry)
inscribe(out)
```